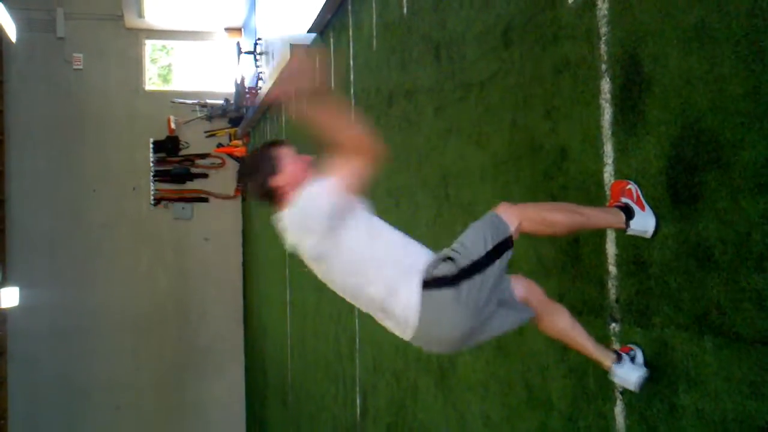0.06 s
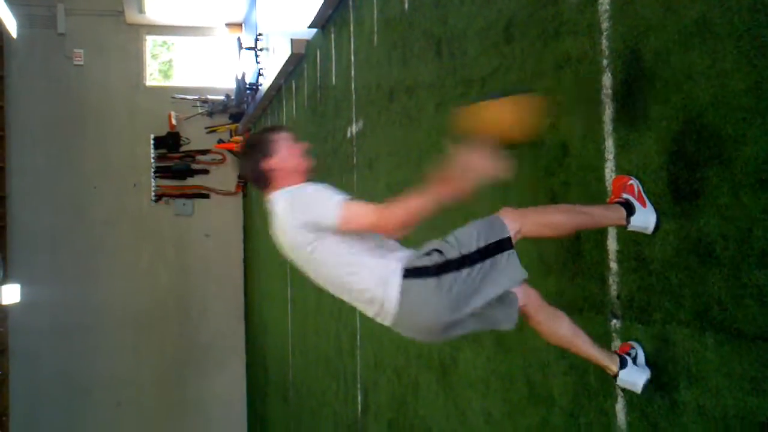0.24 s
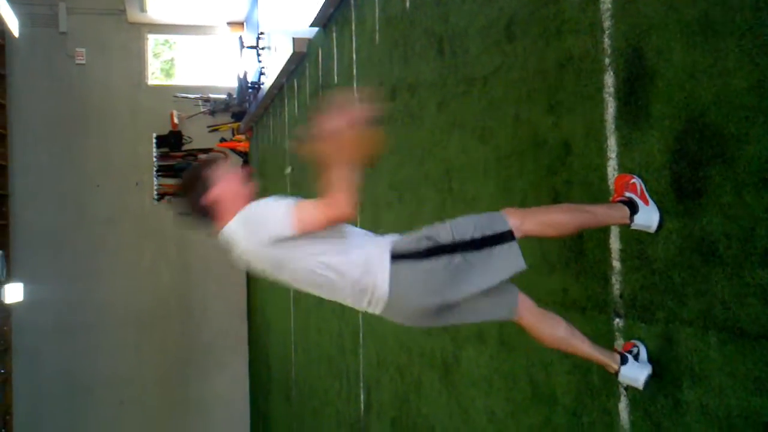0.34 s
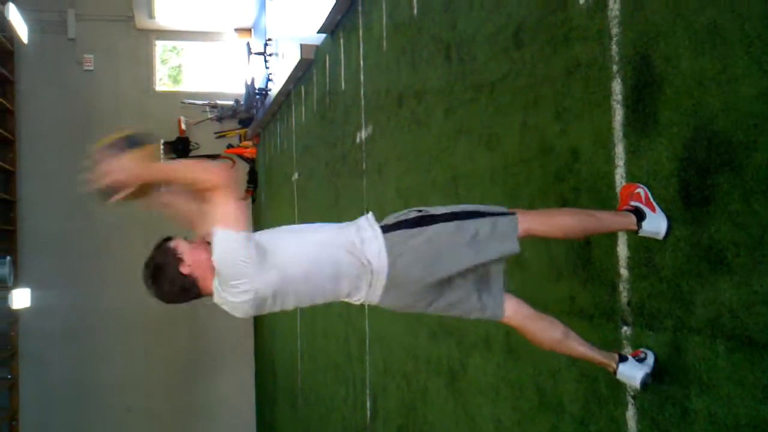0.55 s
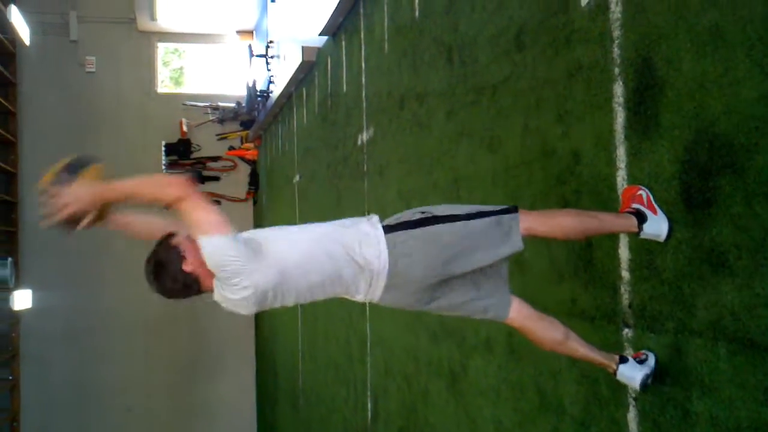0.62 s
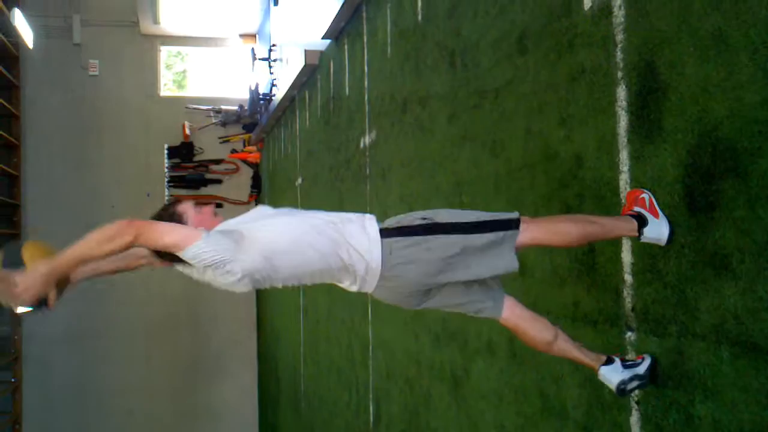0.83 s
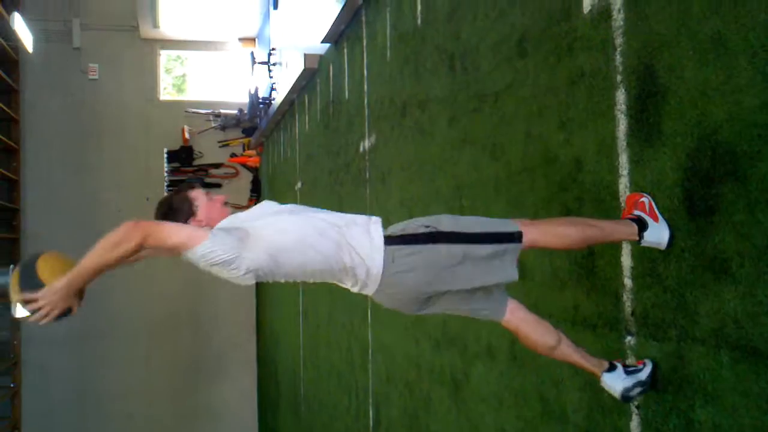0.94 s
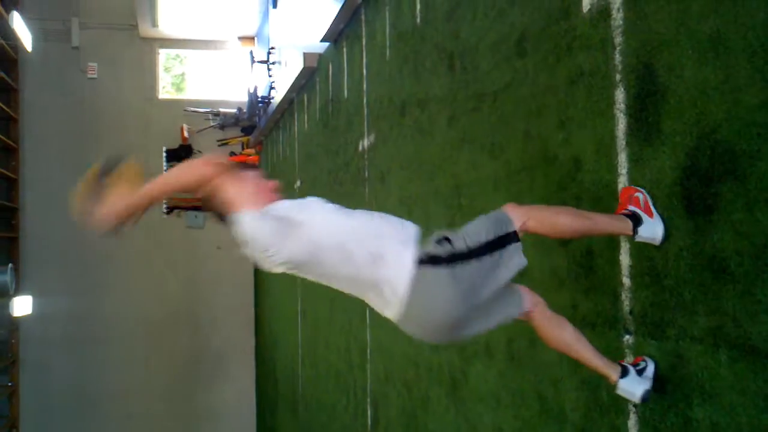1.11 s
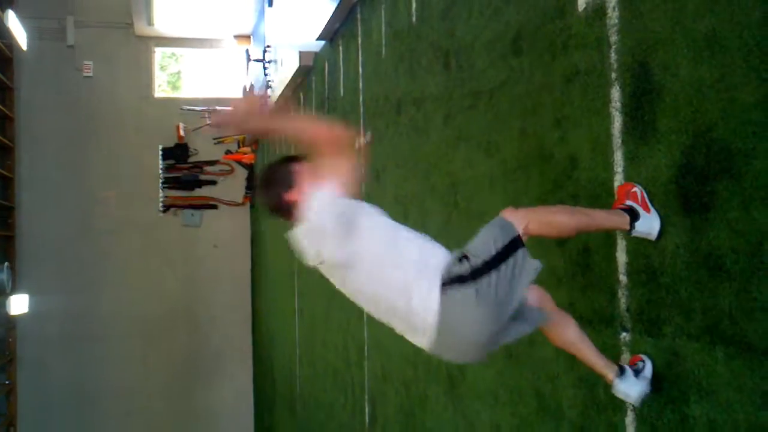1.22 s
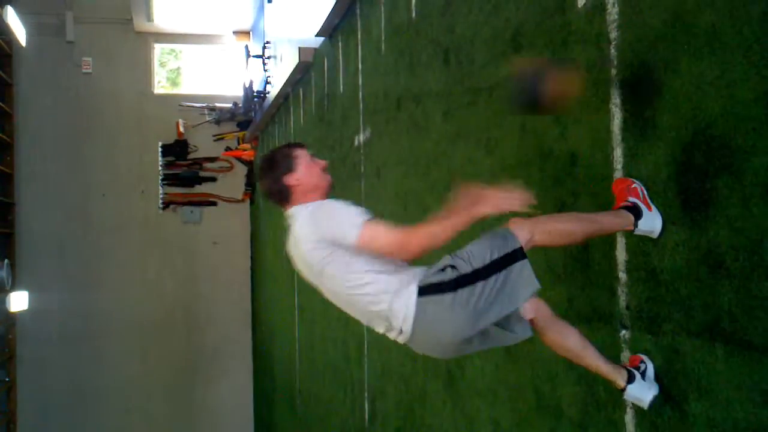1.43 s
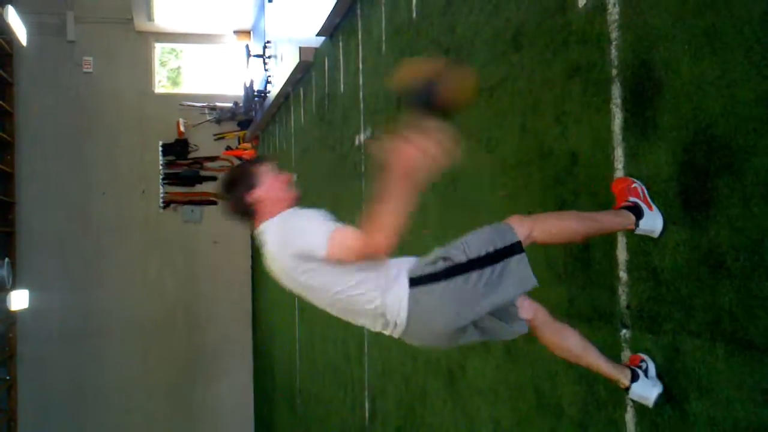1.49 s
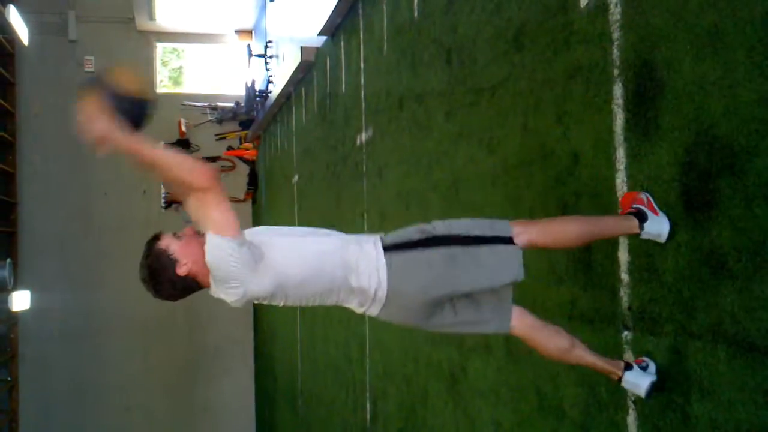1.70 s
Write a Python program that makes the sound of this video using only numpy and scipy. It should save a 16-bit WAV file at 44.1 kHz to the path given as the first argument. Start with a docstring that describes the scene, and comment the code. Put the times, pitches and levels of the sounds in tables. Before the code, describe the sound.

A heavy medicine ball is slammed twice onto turf in a large gym, each close thud booming and echoing off the walls. Hands catch it with light smacks between the hits, over faint clothing rustle and steady ventilation.

```python
"""A heavy medicine ball is slammed twice on the turf of a large gym. Its cover slaps, its body thuds
as it flattens and booms as it springs back, the turf fibres crunch, and the far walls answer.
Hands catch the rebound with light smacks, and clothes rustle over steady ventilation.
During the second boom the sound skips ahead by 23 ms."""
import sys
import numpy as np
from scipy import signal
from scipy.fft import rfft, irfft, next_fast_len
from scipy.io import wavfile
from scipy.ndimage import map_coordinates

SR = 44100
rng = np.random.default_rng(int(sys.argv[2]) if len(sys.argv) > 2 else 0)


def inscribe(sig):
    """Save sig as 16-bit PCM at rate SR to the path in sys.argv[1].

    A 1-D sig is mono; a 2-D sig holds one channel per row.
    Samples are clipped to [-1, 1] before scaling.
    """
    pcm = np.round(np.clip(np.atleast_2d(sig).T, -1, 1) * 32767)
    wavfile.write(sys.argv[1], SR, pcm.astype(np.int16))


N = 77175


def amp(db):
    """Decibels to gain."""
    return 10 ** (np.asarray(db) / 20)


def unit(x):
    """Scale to rms 1."""
    return x / np.sqrt(np.mean(x ** 2) + 1e-20)


def along(points, hz):
    """Read a curve of (hz, value) points on a log frequency axis."""
    freqs, values = np.transpose(points)
    return np.interp(np.log(hz + 1), np.log(freqs + 1), values)


def since(start_s):
    """Seconds since a moment, zero before it."""
    return np.maximum(np.arange(N) / SR - start_s, 0)


def strike(t, attack_s, t60_s):
    """Percussive envelope: a quick smooth rise and an exponential decay."""
    return (1 - np.exp(-(t / attack_s) ** 2)) * np.exp(-np.log(1000) * t / t60_s)


def filtered(x, response):
    """Filter x by a complex response of frequency."""
    size = next_fast_len(N + SR // 2)
    return irfft(rfft(x, size) * response(np.fft.rfftfreq(size, 1 / SR)), size)[..., :N]


def noise(spectrum):
    """Two unrelated coloured noises of rms 1."""
    return unit(filtered(rng.standard_normal((2, N)), lambda hz: amp(along(spectrum, hz))))


def pulse(spectrum, size=4096):
    """A minimum-phase click of peak 1 with the given colour."""
    cepstrum = irfft(np.log(amp(along(spectrum, np.fft.rfftfreq(size, 1 / SR)))))
    cepstrum[1:size // 2] *= 2
    cepstrum[size // 2 + 1:] = 0
    click = irfft(np.exp(rfft(cepstrum)))
    return click / np.abs(click).max()


# Stereo image of the room, 1 is mono: freq_hz, coherence
ROOM_COHERENCE = [(50, 0.23), (300, 0.34), (1200, 1), (2500, 0.1), (10000, 0.052)]

def diffuse(pair):
    """Blend two unrelated signals into a diffuse field heard at two close points."""
    def mid_side(hz):
        angle = np.arccos(np.clip(along(ROOM_COHERENCE, hz), -1, 1)) / 2
        return np.array([np.cos(angle), np.sin(angle)])
    mid, side = filtered(pair, mid_side)
    return np.array([mid + side, mid - side])


# Colour of the air bed: freq_hz, level_db
VENT_SPECTRUM = [(25, -43.5), (60, -20), (115, -4), (200, -1.5), (320, -6), (420, -5.5), (700, -6.5),
                 (1300, -12.5), (2000, -20.5), (3500, -26), (6000, -28), (10000, -27.5), (14000, -36)]

def ventilation(level_db=-56, waver_db=1.31, waver_hz=8):
    """A steady, slightly wavering rush of air."""
    knots = rng.standard_normal(int(N * waver_hz / SR) + 4)
    waver = map_coordinates(knots, [since(0) * waver_hz])
    return amp(level_db + waver_db * waver) * unit(diffuse(noise(VENT_SPECTRUM)))


# Cloth and shoe foley: peak_s, half_length_s, level_db, centre_hz, half_width_octaves
SWISHES = [(0.128, 0.017, -59, 402, .04), (0.135, 0.029, -65, 11000, 0.39),
           (0.628, 0.081, -66.5, 3240, 0.61), (0.948, 0.066, -62.5, 621, 0.056),
           (0.962, 0.061, -72.5, 3590, 0.17), (1.318, 0.013, -58.5, 11300, 0.36),
           (1.71, 0.027, -60, 1735, .1), (1.72, 0.066, -72.5, 3330, 0.19), (1.683, 0.034, -72, 10300, 0.48)]

def clothes():
    """Soft swishes of fabric and scuffs of soles as the thrower moves."""
    out = np.zeros((2, N))
    for peak_s, half_s, db, centre_hz, octaves in SWISHES:
        white = rng.standard_normal((2, N))
        band = filtered(white, lambda hz: np.exp(-(np.log2((hz + 1) / centre_hz) / octaves) ** 2 / 2))
        swell = np.exp(-((since(0) - peak_s) / half_s) ** 2 / 2)
        out += amp(db) * unit(band) * swell
    return diffuse(out)


# Hand contacts on the ball: start_s, level_db, t60_s
HAND_TAPS = [(0.3559, -37.5, 0.02), (.3644, -36, 0.017), (0.413, -35, 0.018), (0.4183, -28, 0.014),
             (0.4208, -47.5, 0.023), (1.3117, -50, 0.013)]
# Colour of a palm smack: freq_hz, level_db
PALM_SPECTRUM = [(60, -18), (220, 14.5), (500, 7), (1200, -6.5), (2000, 2), (3600, 0.5), (5500, -2),
                 (9000, 4.5), (14000, -7.5)]

def hands(attack_s=0.00025, room_db=-10):
    """Fingers and palms smack the ball; a short bright room tail follows."""
    envelope = sum(amp(db) * strike(since(start_s), attack_s, t60_s) for start_s, db, t60_s in HAND_TAPS)
    smacks = noise(PALM_SPECTRUM) * envelope
    tail = rng.standard_normal((2, N)) * strike(since(0), attack_s=0.0094, t60_s=0.35)
    tail /= np.linalg.norm(tail[0])
    return smacks + amp(room_db) * signal.fftconvolve(smacks, tail, axes=1)[:, :N]


# Slapback from the far walls: delay_s, level_db
WALL_ECHOES = [(.0415, -25), (.0852, -24), (.0962, -14), (.1125, -18), (.1335, -21), (.205, -28)]

def wall_echoes(hit, centre_hz=235, q=1.4):
    """The walls return distinct, boomy, band-passed copies of a hit."""
    def response(hz):
        band = 1j * hz / q / (centre_hz - hz * hz / centre_hz + 1j * hz / q)
        return band * sum(amp(db) * np.exp(-2j * np.pi * hz * delay_s) for delay_s, db in WALL_ECHOES)
    return filtered(hit, response)


# Colour of the gym's reverb: freq_hz, level_db
HALL_SPECTRUM = [(40, -14.5), (100, -5.5), (190, -5.5), (260, -4.5), (450, -12), (750, 1.5), (1500, -9.5),
                 (3500, -5.5), (12000, -6)]
# Its decay time: freq_hz, t60_s
HALL_DECAY = [(60, 0.96), (200, 1.284), (450, .8), (800, 0.69), (3000, 0.51), (12000, 0.32)]

def hall_reverb(hit, send_db=-11, rise_s=0.0062):
    """The gym's diffuse tail, whose bass lasts longest."""
    freqs, t, bands = signal.stft(rng.standard_normal((2, N)), SR, nperseg=256)
    decay = np.exp(-np.log(1000) * t / along(HALL_DECAY, freqs)[:, None])
    tail = signal.istft(bands * decay, SR, nperseg=256)[1][:, :N]
    tail *= 1 - np.exp(-(since(0) / rise_s) ** 2)
    tail /= np.linalg.norm(tail[0])
    tail = diffuse(filtered(tail, lambda hz: amp(along(HALL_SPECTRUM, hz))))
    return amp(send_db) * signal.fftconvolve(hit, tail, axes=1)[:, :N]


# Colour of the turf crunch: freq_hz, level_db
TURF_SPECTRUM = [(500, -45), (2000, 3.5), (3800, 7.5), (5200, -12), (6500, 2), (11000, 4), (12200, -1.5),
                 (14000, -9)]

def crunch(start_s, delay_s=0.0018, left_lead_s=0.0003823):
    """The turf fibres are crushed: a tiny bright burst that arrives on the left first."""
    burst = noise(TURF_SPECTRUM)[0] * strike(since(start_s + delay_s), attack_s=0.0005, t60_s=0.016)
    return filtered(burst, lambda hz: np.exp(1j * np.pi * hz * left_lead_s * np.array([[1], [-1]])))


# Colour of the cover's slap: freq_hz, level_db
COVER_SPECTRUM = [(30, -46), (200, -27.5), (490, -6.5), (650, 4), (830, -4), (1080, -2), (1550, -14),
                  (2000, -19), (2600, -30.5), (5000, -31.5)]

def slap(start_s, spread_s, delay_s=0.0025):
    """The cover meets the turf: one dull click, softened by the spread of the contact."""
    def delay_and_soften(hz):
        return np.exp(-2j * np.pi * hz * (start_s + delay_s) - (np.pi * hz * spread_s) ** 2)
    return filtered(pulse(COVER_SPECTRUM), delay_and_soften)


# Tones of the hollow ball: pitch_hz, level_db
BALL_TONES = [(92, -34), (187, -19.5), (372, -36.5)]

def boom(start_s, delay_s=0.01745, length_s=0.035):
    """The hollow ball springs back and hums until it has regained its shape."""
    t = since(start_s + delay_s)
    choke = np.exp(-(t / length_s) ** 4)
    envelope = strike(t, attack_s=0.0021, t60_s=0.25) * choke
    return envelope * sum(amp(db) * np.sin(2 * np.pi * hz * t) for hz, db in BALL_TONES)


def thud(start_s, level_db=-4, end_hz=201.8, drop_hz=266.5, flatten_s=0.003):
    """The ball flattens on the turf: a few heavy cycles that sink in pitch."""
    t = since(start_s)
    cycles = end_hz * t + drop_hz * flatten_s * (1 - np.exp(-t / flatten_s))
    return amp(level_db) * strike(t, attack_s=0.0026, t60_s=0.04) * np.sin(2 * np.pi * cycles)


# The two hero hits: start_s, level_db, crunch_db, slap_db, contact_spread_s
BALL_SLAMS = [(0.2082, 0.5, -31.5, -12.5, 0.0001), (1.3965, 0.5, -26.5, -14.5, 0.000083)]

def slams():
    """The ball hits the turf: low body and sharp transient, both sent into the gym."""
    out = np.zeros((2, N))
    for start_s, level_db, crunch_db, slap_db, spread_s in BALL_SLAMS:
        body = thud(start_s) + boom(start_s)
        transient = amp(slap_db) * slap(start_s, spread_s) + amp(crunch_db) * crunch(start_s)
        hit = amp(level_db) * (body + transient)
        out += hit + wall_echoes(hit) + hall_reverb(hit)
    return out


def scene():
    """Slams up front, hand and cloth foley behind, the air bed underneath."""
    trim_db = [[-0.04], [0.04]]  # left, right
    return (slams() + hands() + clothes() + ventilation()) * amp(trim_db)


# A comb of treble notches: freq_hz, gain_db
TREBLE_NOTCHES = [(2100, 1), (2380, -9), (2620, -24), (2950, -6), (3300, 2), (4400, -1), (5250, -9.5), (6200, 0.5),
                  (7300, 0.5), (7900, -8), (8600, 0.5), (9800, -0.5), (10400, -8.5), (11200, 3)]

def record(dry, skip_at_s=1.4425, skip_length_s=0.0232, fade_s=0.00015, top_hz=14200):
    """The sound skips ahead in the second boom; a comb of notches runs through the treble, which ends at the
    recorder's cut-off."""
    lost = round(skip_length_s * SR)
    ahead = np.pad(dry[:, lost:], ((0, 0), (0, lost)), mode="reflect")
    crossfade = 1 - np.exp(-since(skip_at_s) / fade_s)
    skipped = dry + crossfade * (ahead - dry)
    return filtered(skipped, lambda hz: amp(along(TREBLE_NOTCHES, hz)) * (hz < top_hz))


dry = scene()
out = record(dry)
inscribe(out)
```